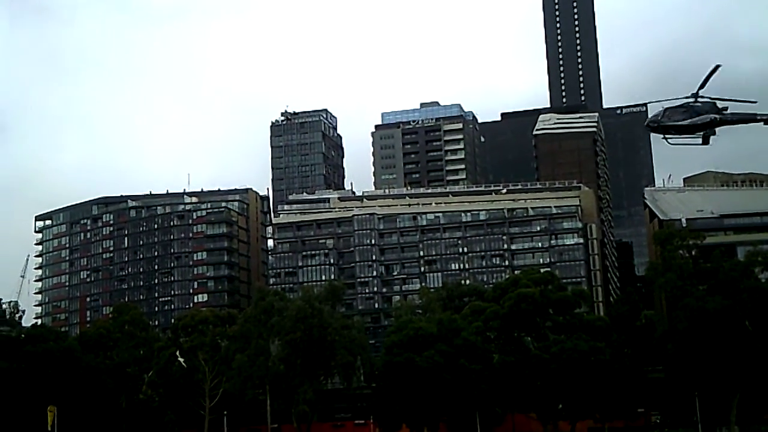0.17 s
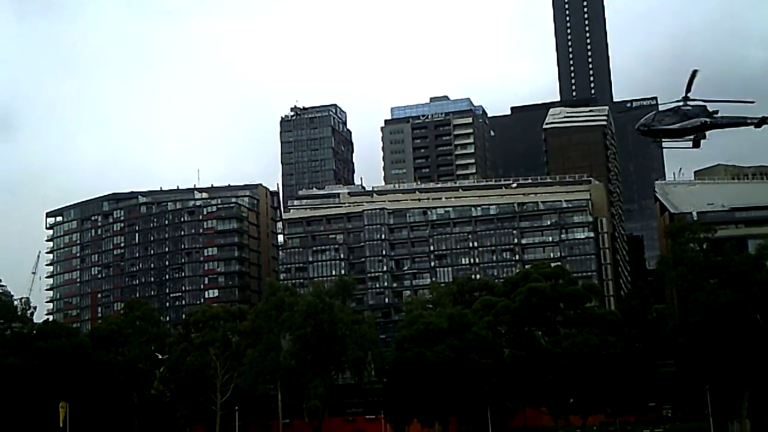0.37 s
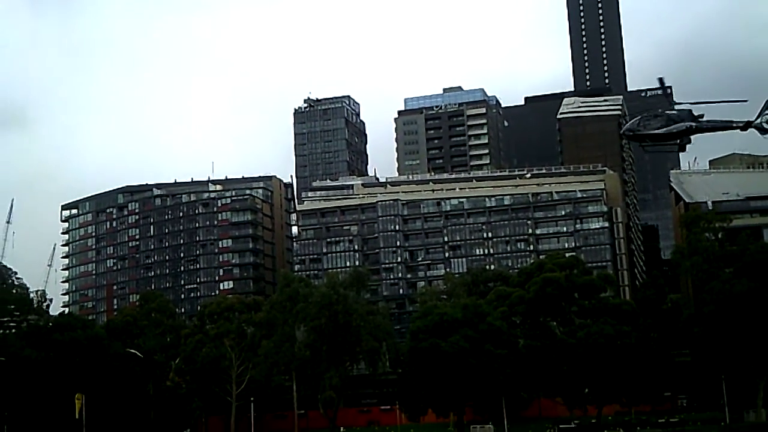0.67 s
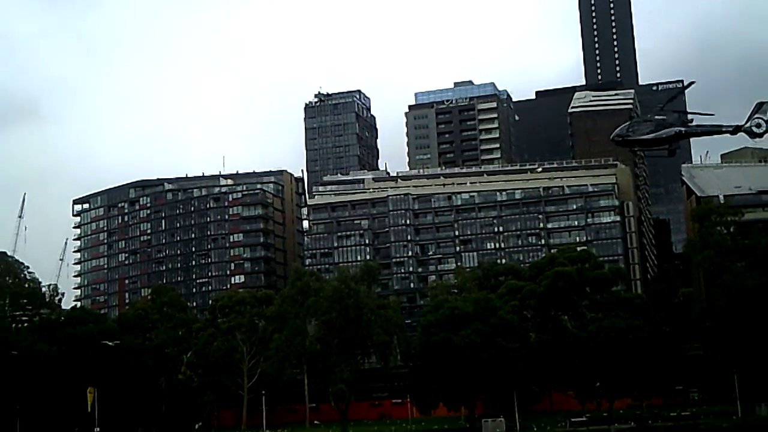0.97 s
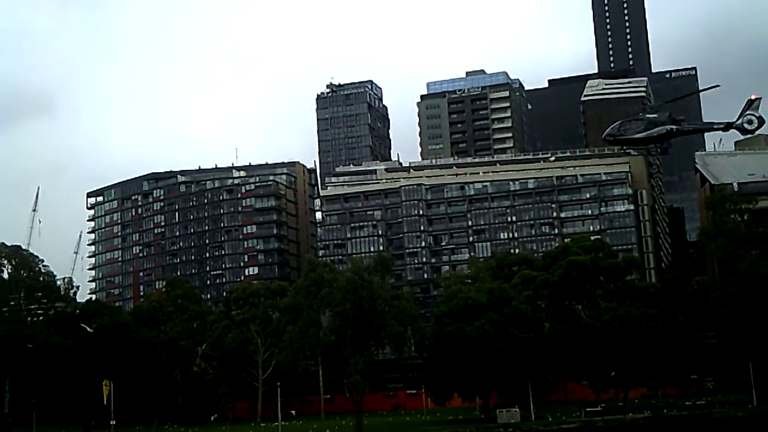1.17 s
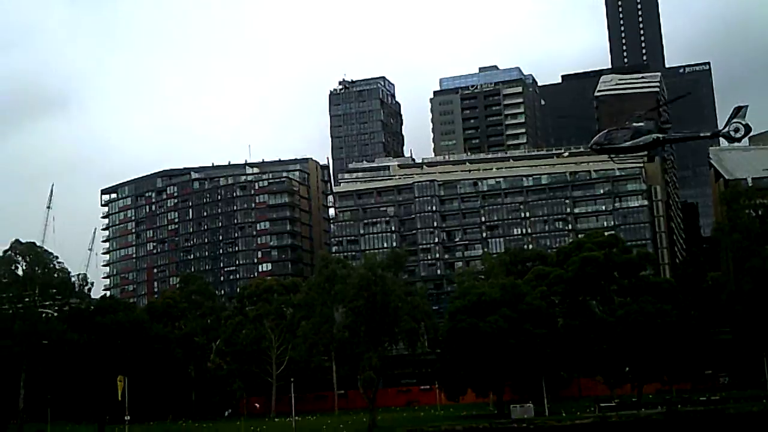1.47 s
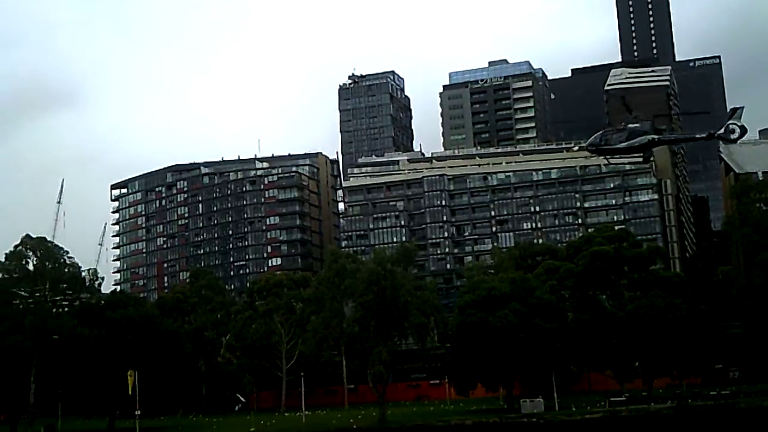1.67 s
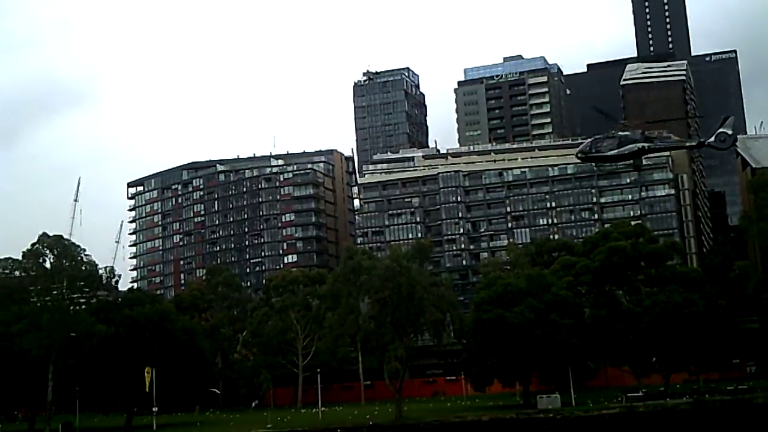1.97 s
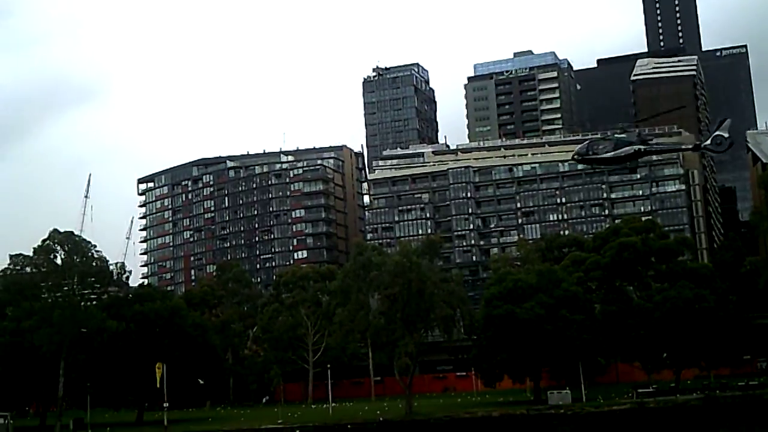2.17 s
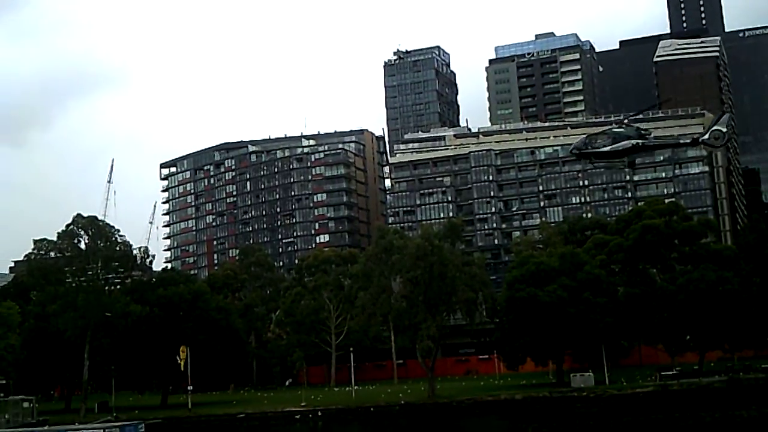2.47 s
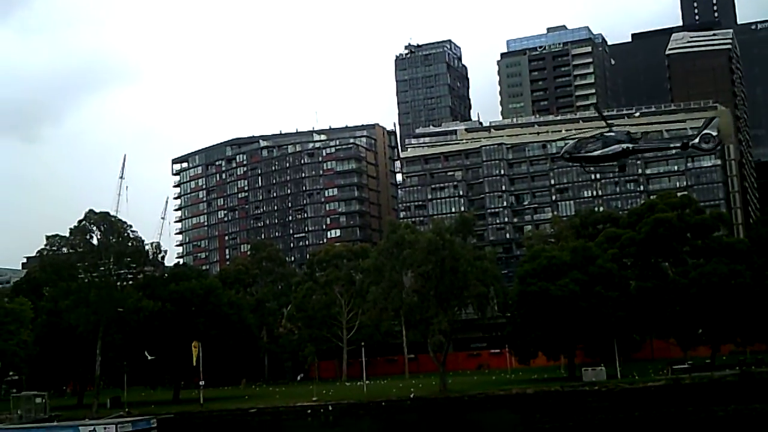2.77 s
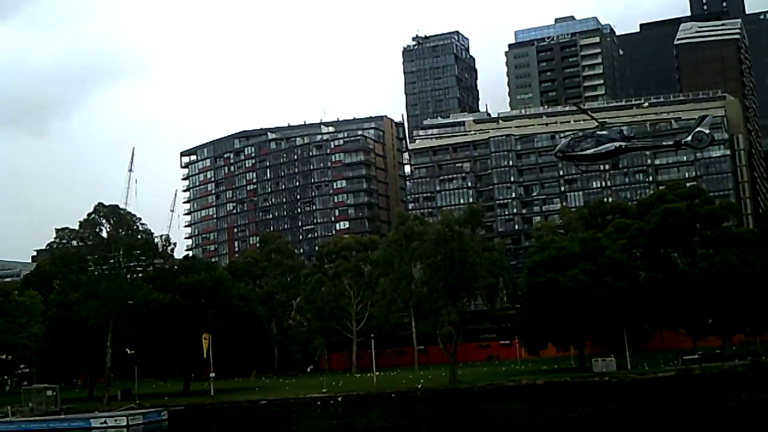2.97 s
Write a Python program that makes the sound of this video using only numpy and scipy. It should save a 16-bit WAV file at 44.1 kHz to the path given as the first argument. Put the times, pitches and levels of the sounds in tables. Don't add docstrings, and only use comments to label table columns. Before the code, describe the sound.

Continuous low helicopter chopping with rough, uneven slaps and a broad windy roar, running from start to end as it descends near buildings; the small microphone clips, and a brief click interrupts it midway.

```python
import sys
import numpy as np
from scipy import signal
from scipy.fft import rfft, irfft, next_fast_len
from scipy.io import wavfile
from scipy.ndimage import uniform_filter1d, map_coordinates

SR = 44100
rng = np.random.default_rng(int(sys.argv[2]) if len(sys.argv) > 2 else 0)


def materialize(psi):
    bounded = np.clip(np.atleast_2d(psi).T, -1, 1)
    quanta = np.round(bounded * 32767).astype(np.int16)
    wavfile.write(sys.argv[1], SR, quanta)


def gain_from_db(level_db):
    decades = np.asarray(level_db, float) / 20
    return 10 ** decades


N = 137592
SKIP_AT_S, SKIP_S = 1.38703, .0222


def unit(x):
    return x / np.sqrt(np.mean(x ** 2) + 1e-20)


def curves(rows):
    s, *columns = np.transpose(rows)
    return [np.interp(np.arange(N) / SR, s, column) for column in columns]


def wobble(rate):
    points = rng.standard_normal(int(N * rate / SR) + 4)
    return map_coordinates(points, [np.arange(N) * rate / SR])


def filtered(x, response):
    size = next_fast_len(N + 8192)
    hz = np.fft.rfftfreq(size, 1 / SR)
    return irfft(rfft(x, size) * response(hz), size)[:N]


def blade_angle():
    blade_hz, start_rad = 19.33, 1.47
    t = np.arange(N) / SR
    craft_time = t + SKIP_S * (t >= SKIP_AT_S)
    return start_rad + 2 * np.pi * blade_hz * craft_time


def beat(angle):
    # t/s, first/dB, second/dB, third/dB
    low_levels = [(0, -6.3, -15, -25), (.4, -6.7, -17, -26), (.72, -7.7, -19, -19), (1.3, -8.9, -22, -21),
                  (1.78, -9.2, -28, -26), (2.25, -7.4, -23.5, -23), (2.7, -7.3, -24, -32),
                  (3.12, -8, -23.5, -26)]
    # overtone number, lag/rad, change/(rad/s)
    low_lags = [(1, 0, 0), (2, -3.0, .75), (3, -2, -1)]
    # overtone number, peak level/dB
    high_levels = [(4, -32), (5, -37), (6, -31.5), (7, -32), (8, -34), (9, -32)]
    t = np.arange(N) / SR
    total = np.zeros(N)
    for db, (k, lag, turn) in zip(curves(low_levels), low_lags):
        total += gain_from_db(db + .3 * wobble(4)) * np.cos(k * angle + lag + turn * t)
    for k, db in high_levels:
        total += gain_from_db(db + 2.5 * wobble(3)) * np.cos(k * angle + 2.5 + .8 * wobble(2.5))
    return total


def hard_slaps(low):
    # t/s, peak level/dB, ring f/Hz
    hard_hits = [(0.018, -6.5, 360), (0.0646, -6, 343), (0.1154, -10.5, 360), (0.1212, -6.5, 370),
                 (0.1497, -12, 280), (0.168, -15, 305), (0.2238, -8.5, 330), (0.2733, -9, 436),
                 (0.325, -14, 406), (0.3732, -16, 429), (0.4074, -11, 378), (0.4271, -15, 327),
                 (0.4825, -7.5, 365), (0.5307, -11.5, 362), (0.5367, -7, 335), (0.6375, -6.5, 356),
                 (0.6836, -3, 297), (0.74, -8.5, 357), (0.7918, -10.5, 318), (0.845, -10.5, 355),
                 (0.8964, -9.5, 382), (0.9009, -8, 333), (0.9237, -6, 335), (0.9375, -10.5, 325),
                 (0.9463, -10.5, 354), (0.9984, -4, 410), (1.0488, -6, 326), (1.1461, -12, 299),
                 (1.1532, -12, 322), (1.2069, -3, 327), (1.31, -6.5, 340), (1.388, -16.5, 317),
                 (1.4427, -10.0, 290), (1.5189, -9, 340), (1.5496, -11.5, 400), (1.862, -11.5, 363),
                 (1.9165, -13.5, 294), (2.0432, -10, 352), (2.1636, -11, 356), (2.2745, -7.5, 361),
                 (2.394, -6.5, 332), (2.426, -11, 330), (2.5329, -7.5, 274), (2.5753, -7, 357),
                 (2.6081, -15.5, 270), (2.6548, -9.5, 350), (2.7065, -15, 254), (2.7117, -3, 264),
                 (2.75, -10.5, 410), (2.863, -11.5, 284), (2.8972, -11.5, 346), (2.915, -20, 343),
                 (3.016, -10, 249), (3.022, -9, 324), (3.1115, -15, 350)]
    half_length_s, hush_share = 0.0017, 0.52
    s, db, hz = np.transpose(hard_hits)[:, :, None]
    t = np.arange(-SR // 50, SR // 50) / SR
    at = np.clip(np.round(s * SR) + np.round(t * SR), 0, N - 1).astype(int)
    shape = np.exp(-.5 * (t / half_length_s) ** 2)
    lean = np.sign(low[(s * SR).astype(int)])
    rings = lean * gain_from_db(db) * shape * np.cos(2 * np.pi * hz * t)
    nearness = shape ** .4 + 0 * s
    near = np.bincount(at.ravel(), nearness.ravel(), N)
    hush = 1 - hush_share * np.clip(near, 0, 1)
    return np.bincount(at.ravel(), rings.ravel(), N), hush


def soft_slaps(angle):
    # t/s, level/dB
    slap_level = [(0, -24.5), (.45, -32), (.75, -29.5), (1.3, -21.5), (1.75, -31), (2.2, -32), (2.7, -34.5),
                  (3.12, -51)]
    # f/Hz, width/Hz, level/dB
    thud_rings = [
        (300, 110, 9),
        (404, 81, -3.5),
        (1070, 1200, -22.5),
    ]
    late_s, scatter_s, scatter_db = .003, .0035, 2.5
    troughs = np.flatnonzero(np.diff(np.floor(angle / (2 * np.pi) + .5))) / SR
    chance = rng.standard_normal((len(troughs), 2, 3))
    s = troughs[:, None] + late_s + scatter_s * chance[:, 0]
    at = np.clip(s * SR, 0, N - 1).astype(int)
    blows = np.bincount(at.ravel(), gain_from_db(scatter_db * chance[:, 1]).ravel(), N)

    def ring(f):
        total = 0
        for centre, width, db in thud_rings:
            total = total + gain_from_db(db) * 1j * f * width / (centre ** 2 - f ** 2 + 1j * f * width)
        return total / (1 + (f / 1200) ** 4)

    return -gain_from_db(curves(slap_level)[0] - 10) * unit(filtered(blows, ring))


def rush(colour, patchy_db):
    z = signal.stft(rng.standard_normal(N), nperseg=512)[2]
    across_pitch = uniform_filter1d(rng.standard_normal(z.shape), size=6, axis=0)
    patches = unit(uniform_filter1d(across_pitch, size=10, axis=1))
    noise = signal.istft(z * gain_from_db(patchy_db * patches), nperseg=512)[1][:N]
    f, db = np.transpose(colour)
    return unit(filtered(noise, lambda hz: gain_from_db(np.interp(np.log(hz + 1), np.log(f), db, -120, -120))))


def roar(angle):
    # t/s, level/dB
    wash_level = [(0, -20.5), (.3, -18.5), (.6, -18.5), (.95, -17.5), (1.3, -18.5), (1.6, -20.5),
                  (1.85, -19), (2.2, -19), (2.6, -17.5), (3.12, -18.5)]
    jet_level = [(0, -37), (.3, -39), (.6, -36.5), (.915, -38), (.945, -31), (1.04, -36.5), (1.2, -38.5),
                 (1.3, -34.5), (1.38, -33), (1.45, -38), (1.6, -42), (1.77, -36.5), (1.95, -40),
                 (2.18, -35.5), (2.36, -40), (2.62, -36), (3.12, -35.5)]
    hiss_level = [(0, -67), (.5, -63.5), (.915, -63), (.945, -54), (1.03, -63), (1.2, -64), (1.36, -61),
                  (1.5, -67), (2.2, -62), (3.12, -61)]
    # f/Hz, level/(dB per Hz)
    wash_colour = [(25, -11.5), (90, -15), (150, -6.5), (245, -2.5), (310, -4), (500, -5.5), (590, -9.5),
                   (1700, -58.5)]
    body_colour = [(400, -26.5), (650, 0), (880, -4.5), (1100, -2.5), (1400, -7.5), (1650, -19.5),
                   (2000, -42)]
    jet_colour = [(1400, -39.5), (1700, -4.5), (2000, 1.5), (2350, -4.5), (2800, -5), (3150, -17),
                  (3900, -19.5), (4150, -29.5)]
    hiss_colour = [(3900, -16), (4150, -3.5), (4500, 0.5), (5100, -15), (5650, -9.5), (6000, -10.5),
                   (6500, -8), (8800, -21.5)]
    shared_db = 0.8 * wobble(11.1) + 0.13 * wobble(45)

    def swell(depth_db, late_rad):
        return unit(gain_from_db(depth_db * np.cos(angle - np.pi - late_rad) + shared_db))

    wash = swell(1.6, 1.0) * rush(wash_colour, patchy_db=0.5)
    body = gain_from_db(-5.5) * swell(1.6, 1.6) * rush(body_colour, patchy_db=-0.42)
    jet = swell(1.5, 1.9) * rush(jet_colour, patchy_db=1.18)
    hiss = swell(1.5, 1.3) * rush(hiss_colour, patchy_db=1.3)
    flow = gain_from_db(curves(wash_level)[0] - 3)
    bright = flow * body + gain_from_db(curves(jet_level)[0]) * jet + gain_from_db(curves(hiss_level)[0]) * hiss
    return flow * wash, bright


def ground(x):
    # t/s, delay/ms
    echo_delay = [(0, 8.03), (1.2, 6.65), (2.2, 6.13), (3.12, 5.72)]
    echo_db, echo_top_hz = -5.5, 850
    dull = filtered(x, lambda hz: 1 / (1 + (hz / echo_top_hz) ** 2))
    late = np.arange(N) - curves(echo_delay)[0] * SR / 1000
    return x + gain_from_db(echo_db) * map_coordinates(dull, [late], mode="mirror")


def scene():
    angle = blade_angle()
    low = beat(angle)
    rings, hush = hard_slaps(low)
    wash, bright = roar(angle)
    dull_part = hush * ground(soft_slaps(angle) + wash)
    bright_part = np.sqrt(hush) * ground(bright)
    return (low + rings + dull_part + bright_part)[None]


def roll_off(x):
    return signal.sosfilt(signal.butter(12, 21000, fs=SR, output="sos"), x)


def record(dry):
    overload, leak_db = .705, -15
    dulling = signal.butter(6, 7800, fs=SR, output="sos")
    top_limit = signal.butter(30, 16300, fs=SR, output="sos")
    flattened = np.clip(dry, -overload, overload)
    pieces = np.split(flattened, [int(np.ceil(SKIP_AT_S * SR))], axis=1)
    joined = np.hstack([signal.sosfiltfilt(dulling, p) + gain_from_db(leak_db) * p for p in pieces])
    mix = signal.sosfiltfilt(top_limit, joined / (1 + gain_from_db(leak_db)))
    return roll_off(mix)


dry = scene()
out = record(dry)
materialize(out)
```